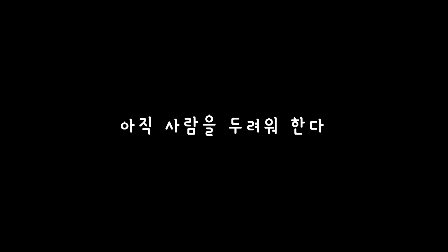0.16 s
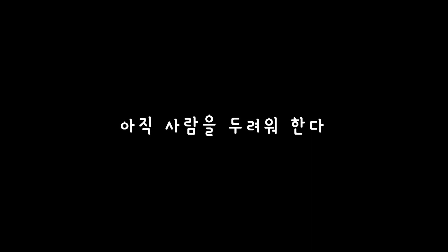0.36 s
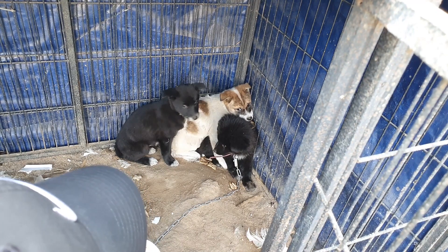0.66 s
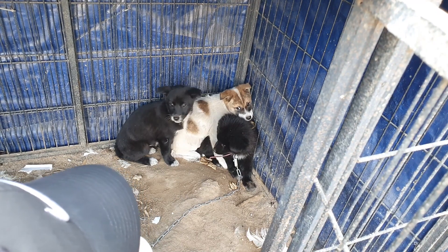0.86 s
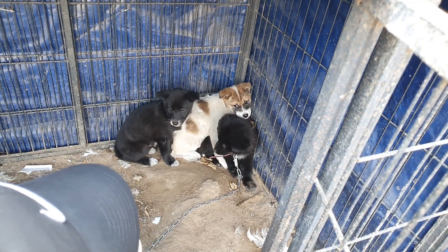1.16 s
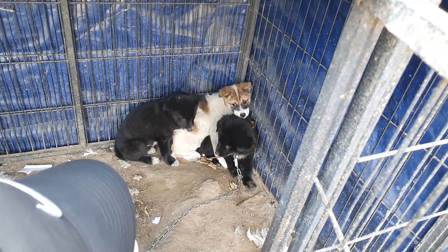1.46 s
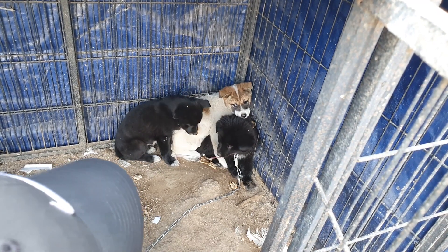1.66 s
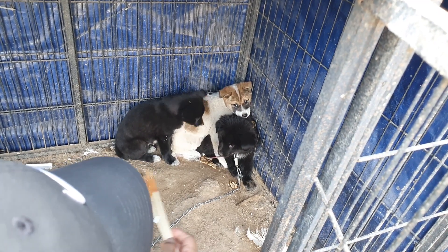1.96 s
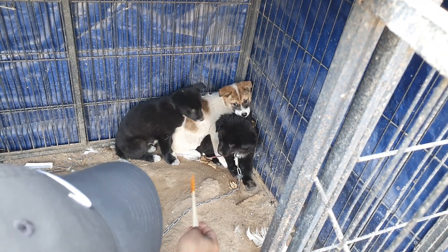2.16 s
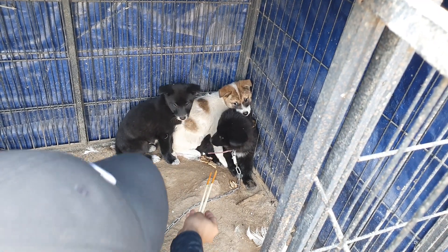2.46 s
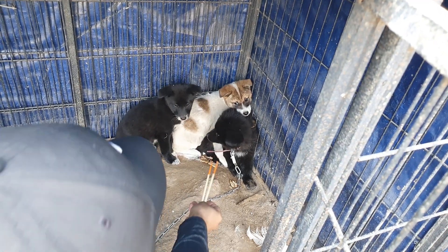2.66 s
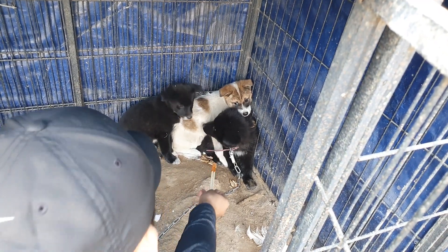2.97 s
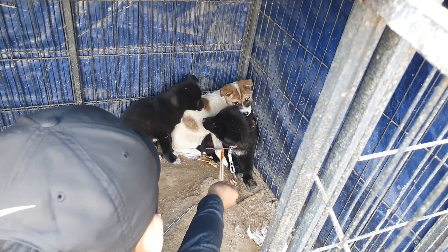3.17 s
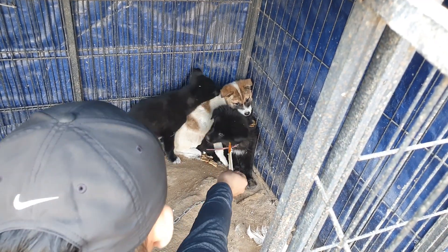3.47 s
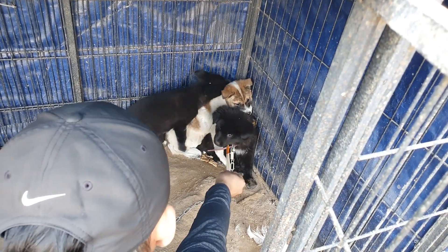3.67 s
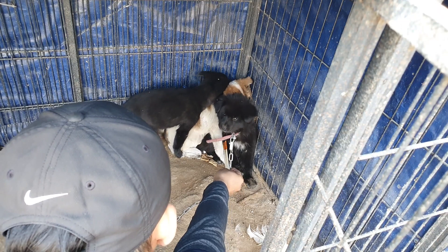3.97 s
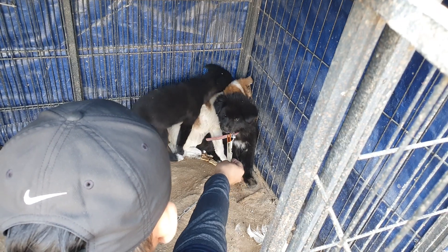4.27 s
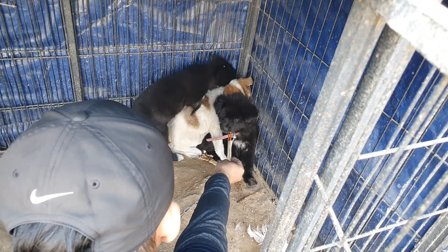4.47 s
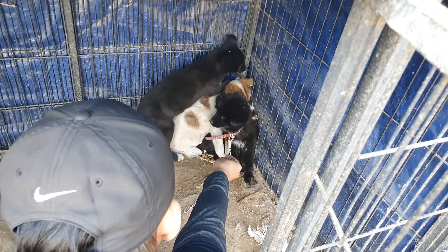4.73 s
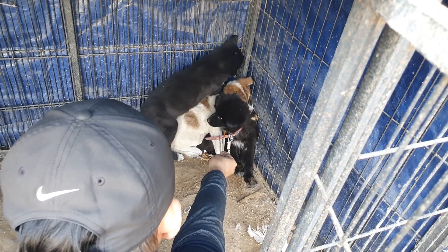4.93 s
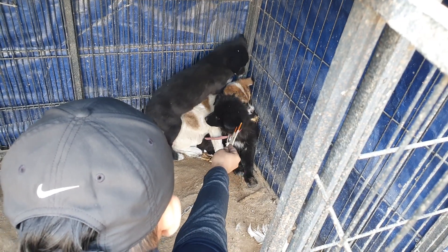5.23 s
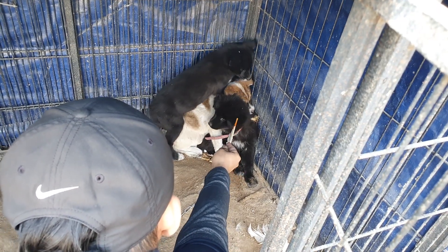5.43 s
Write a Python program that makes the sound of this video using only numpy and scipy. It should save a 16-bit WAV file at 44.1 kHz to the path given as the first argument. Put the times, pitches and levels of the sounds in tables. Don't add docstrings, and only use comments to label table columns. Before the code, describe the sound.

After brief silence, a high breaking goose wail, a rapid run of harsh honks, then quiet yard noise, sparrow chirps and distant calls.

```python
import sys
import numpy as np
from scipy import signal
from scipy.fft import rfft, irfft, next_fast_len
from scipy.io import wavfile
from scipy.ndimage import uniform_filter1d, minimum_filter1d, map_coordinates

SR = 44100
rng = np.random.default_rng(int(sys.argv[2]) if len(sys.argv) > 2 else 0)


def volts_from_db(level):
    exponent = np.asarray(level, float) / 20
    return 10 ** exponent


def master_out(mix):
    frames = np.transpose(np.atleast_2d(mix))
    ceiling = np.clip(frames, -1, 1)
    pcm = np.round(ceiling * 32767).astype(np.int16)
    wavfile.write(sys.argv[1], SR, pcm)


N = 246959
START_S = .434

# freq_hz, density_db_per_hz
YARD_SPECTRUM = [(88, -29.5), (150, -5.5), (216, -6.5), (330, -5.5), (434, -7), (572, -9.5), (825, -10),
                 (1010, -13.5), (2480, -24.5), (3260, -16.5), (5070, -35.5), (7310, -35), (12000, -53.5),
                 (15600, -82.5), (22000, -120)]
# freq_hz, likeness_0_1
YARD_LIKENESS = [(100, 0.98), (300, 1), (700, 0.65), (1500, 0.55), (4000, 0.1), (9000, 0.089)]
# freq_hz, density_db_per_hz
TRAFFIC_SPECTRUM = [(13, -67), (22, -38), (40, -12), (59, 9), (75, 5), (150, -9.5), (200, -15.5),
                    (260, -45), (440, -120)]
# time_s, level_db
TRAFFIC_COURSE = [(0.6, -58.5), (0.67, -60.5), (1.34, -60.5), (1.75, -59), (1.92, -59.5), (2.12, -59.5),
                  (2.28, -59), (2.85, -67), (3.27, -64), (3.84, -61), (4.94, -60), (5.08, -59),
                  (5.6, -56.5)]
YARD_LEVEL_DB = -66 + 1.5

# freq_hz, phase_rad
LEFT_LEAD_RAD = [(0, 0), (690, 1.5), (950, 1.9), (1380, 3.1), (2070, 4.9), (2760, 6.6), (3620, 9.2),
                 (4300, 12.7), (5170, 13.4), (7400, 20.5), (16000, 44)]
# freq_hz, gain_db
LEFT_SHADE_DB = [(200, 0), (380, -1), (690, 4), (950, -2), (1380, -7), (2070, -4.5), (2760, -6.5),
                 (3500, -10.5), (4300, -7), (5170, -1), (7400, -2), (15000, -3)]
# freq_hz, t60_s
PEN_T60 = [(200, 0.6), (1200, 0.13), (3500, 0.21), (9000, 0.03)]
# delay_ms, left_db, right_db
WALL_ECHOES = [
    (1.3, -23, -27.5),
    (2.9, -26.5, -9.5),
    (4.7, -11, -8.5),
    (7.9, 0.5, -3.5),
    (12.1, -13.5, -9),
]

# time_s, pitch_hz, level_db
CRY_COURSE = [(0.433, 673, -23.5), (0.5, 670, -22), (0.573, 635.6, -29), (0.589, 663.8, -20),
              (0.802, 725.1, -19.5), (1.097, 713.6, -21), (1.617, 686.1, -23), (1.836, 659.7, -26.5),
              (1.969, 641.7, -30), (2.032, 635, -29), (2.124, 608.3, -22.5)]
# freq_hz, then gain_db at five even stages
CRY_THROAT_DB = [(300, -42, -46.5, -64, -37.5, -35.5), (520, -29.5, -23.5, -34, -17.5, -16),
                 (692.87, -13, -26, -21, -19.5, -37), (1040, -47, -10.5, -15, -24.5, -35),
                 (1134, -0.5, -6, -2, -5.5, -2.5), (1445, 8, 0, -0.5, 2.5, -10.5),
                 (1690, -26, -17.5, -37, -32, -13.5), (1840, -32, -14, -49.5, -34, -22),
                 (2052, -42, -39.5, -46.5, -43.5, -42), (2600, -17.5, -11.5, -20, -11.5, -20),
                 (2730, -37.5, -29.5, -60, -55.5, -45), (3370, -37.5, -42, -65.5, -92, -43),
                 (3966, -29, -39, -32, -40, -29), (4486, -25, -47, -17.5, -11, -21),
                 (4575, -51.5, -74, -55.5, -47.5, -47.5), (5700, -23.5, -36, -41.5, -31.5, -33.5),
                 (8067, -56, -34.5, -35.5, -53, -52), (9150, -66, -63.5, -45, -42.5, -54.5),
                 (10842, -53.5, -56, -49, -46, -54), (16010, -66, -65, -59, -65.5, -60.5)]
# middle_s, length_s, pitch_hz, level_db
CRY_WAVERS = [
    (0.53, 0.06671, -5.5, 1),
    (1.234, .04, -8, -2),
    (1.43, 0.16, 1.5, -1),
    (0.628, 0.14, 74, 0.5),
    (0.731, 0.17, -41.5, 1),
    (0.987, 0.25, -8, 2),
    (1.72, 0.069, -2.5, -2),
    (1.775, 0.081, 0, 3),
    (1.84, 0.074, -1, 0.5),
    (1.957, 0.021, 0.5, -12),
]
# middle_s, length_s, roughness_0_1, alternation_0_1
CRY_BREAKS = [(0.504, 0.23, 0, 0), (0.93, 0.34, 0.08, 0), (2.149, .03, 0.54, .4), (0.562, 0.11, 0.56, 0.4),
              (0.66, 0.2, 0.01, 0.03), (0.735, 0.07, 0.37, 0.05), (1.952, 0.38, 0.01, 0.07),
              (0.841, 0.16, 0.06, 0), (0.873, 0.021, 0.2, 0.12), (0.918, 0.062, 0.2, 0.3),
              (0.98, 0.016, 0, 0.2), (1.026, 0.073, 0.11, 0.22), (1.451, 0.35, .001, 0.7),
              (1.601, 0.3, 0.01, 0.29), (2.151, 0.042, 0.71, 0.5)]
# freq_hz, density_db_per_hz
RASP_SPECTRUM = [(500, -65), (900, -25), (1150, 3), (1500, 8.5), (1850, 7.5), (2400, -58), (3000, -31),
                 (4000, -61)]
# freq_hz, density_db_per_hz
AIR_SPECTRUM = [(1500, -62), (2500, -23), (4300, -1), (5000, -10), (7500, 2.5), (9000, -12), (12000, -10),
                (15800, -24)]
CRY_END_S, END_FALL_HZ, END_FADE_DB = 0.065, 140.1, 31.5
TRILL_S, TRILL_LENGTH_S, TRILL_PER_S, TRILL_HZ, TRILL_DB = 0.8, 0.4, 29, 7, 1
TREMOR_SHARE, TREMOR_PER_S, SETTLES_S = .012, 260, 1.07
CRY_ROUGH_0_1 = .012
RASP_DB, AIR_DB = -6, -40

# start_s, level_db, t60_s, above_9khz_db
SNORT_PUFFS = [
    (1.244, -42.5, 0.18674, -10.5),
    (2.381, -60, 0.0095, 8.5),
    (4.652, -49.5, 0.214, 0.5),
    (4.848, -61.5, 0.2665, 1.5),
    (5.277, -55.5, 0.2786, -5.5),
]
SNORT_ATTACK_S = [0.0052, 0.00103, 0.00115, 0.0157, 0.0018]
# freq_hz, density_db_per_hz
NOSE_SPECTRUM = [(1180, -75), (2000, -45), (2200, -15.5), (3460, -0.5), (6040, -14), (8080, 1),
                 (9270, -24.5), (10500, -12), (15500, -20)]

# start_s, length_s, from_hz, to_hz, level_db
SMALL_TONES = [
    (4.675, .1, 3700, 3150, -60),
    (4.84, .055, 5150, 5300, -71),
    (4.908, .028, 3750, 3350, -57),
    (4.925, .035, 3200, 2650, -59),
    (4.84, .04, 1900, 1850, -64),
    (4.98, .01, 6700, 6400, -66),
    (3.76, .04, 420, 400, -59),
    (2.2, .2, 1290, 1240, -66),
    (2.722, .022, 1180, 1230, -37),
]

# start_s, attack_s, hold_s, peak_db, sag_db
HONK_TIMING = [(2.423, 0.078, 0.035, -13, 6.5), (2.63, 0.018894, 0.033, -14, 0),
               (2.734, 0.015, 0.054, -15, 8), (2.861, 0.022, 0.047, -9.5, 12),
               (2.921, 0.0088, 0.058, -27, -0.5), (3.022, 0.038, 0.044, -13, 2.5),
               (3.146, 0.044, 0.037, -32.5, 4), (3.218, 0.018, 0.056, -16.5, 5.5),
               (4.991, 0.052, 0.063, -29, 14), (5.219, 0.016, 0.1, -39, 1.5),
               (5.439, 0.017, 0.12, -40, 0.5)]
# start_hz, middle_hz, end_hz
HONK_PITCH_HZ = [(195, 219, 192), (223, 230, 221), (238, 218, 195), (228, 232, 222), (200, 213, 211),
                 (234, 228, 220), (209, 195, 184), (216, 208, 205), (150, 165, 157), (668, 824, 730),
                 (661, 850, 747)]
HONK_BREAKUP = [(.08, 0, 1), (.08, 0, 1), (.22, 0, .9), (.03, 0, 1), (.14, 0, .9), (0, 0, .9), (.3, 0, .9),
                (.3, 0, .8), (.15, 0, 1), (.17, .3, .55), (.2, .75, .45)]
STRONG_EVERY = [1, 1, 1, 1, 1, 1, 1, 1, 1, 3, 5]
# mode_width_hz, fundamental_db, highs_db
HONK_COLOUR = [(375, 5, 1), (230, -9, -9), (377.6, -2.5, -3.5), (170, -25, 0.5), (139.5, -15.5, -3),
               (244, -15.5, 5), (260, -8.5, -5), (330.8, 0.5, 1.5), (480, 10, -5.5), (463.3, -5.5, -0.5),
               (523, 8, -2.5)]
NECK_STRETCH = [(.9, 1.03, .94), (.96, 1.01, 1.02), (1.02, 1, 1.01), (.99, 1.01, .9), (.98, 1, 1),
                (.9, 1, .99), (1, .99, 1), (1, 1, .97), (.84, 1.1, .98), (.94, 1, 1), (.94, 1, 1)]
# middle_share, length_share, level_db, leak_ratio
PRESSURE_PUSH = [(0.79, 0.17, 1, 1.5), (0.4, 0.23, 0, 0.74), (0.19, 0.51, 4.5, 6.1), (.3, .3, 1, 1),
                 (.5, .3, -0.5, 1), (.5, .3, 2.5, 0.52), (.5, .3, -2.5, 2), (0.76, 0.13, 3.5, 2.9),
                 (0.3694, 0.16, 3, 2.885), (.5, 0.37, 1.5, 3.0196), (0.51, 0.34, 2.5, 3.8)]
# swell_exponent, release_db_per_s
HONK_EDGES = [(1.5, 949), (1.5, 899), (1.5, 948.5), (1.5, 950.5), (1.5, 949.5), (1.1, 1500), (1.5, 948.5),
              (1.3, 999), (1.4, 800), (1.6, 900), (1.6, 897.5)]
# freq_hz, gain_db
NEAR_MODES = [
    [(850, -12.5), (1292, 0), (1990, 1.5), (2850, -6.5), (3400, 5), (4177, -25.5), (4780, -26)],
    [(1141, -2.5), (1593, -18.5), (2024, -16), (2800, 1), (3300, -11), (4113, -16)],
    [(1120, 3.5), (1680, -21.5), (2842, -2), (3165, -24.5), (3833, -19), (4587, -35)],
    [(670, -19.5), (1414, 0), (4150, -5.5), (2049, -8), (2749, -0.5), (3140, -1)],
    [(624, -6), (1141, 2), (1486, -2.5), (1895, -2), (2606, -9.5), (3445, 6.5)],
    [(900, -5.5), (1141, 4.5), (1615, -19.5), (2067, -13.5), (2756, 1), (3208, -19.5), (3704, 6)],
    [(775, 1.5), (1120, -9), (1507, -11), (2649, -24), (3338, 5), (4953, -19.5)],
    [(1163, 3), (1895, -14.5), (3015, -3), (3381, -10), (3984, -7.5), (4328, -31)],
]
# freq_hz, gain_db
FAR_MODES = [
    [(581, -29), (947, -4.5), (1314, -0.5), (2089, -14), (3100, 7.5), (3850, -9), (4479, -34)],
    [(797, -8.5), (1529, -4.5), (2089, -9), (2433, -19), (3208, 1), (4694, -45)],
    [(840, -18), (1050, -9.5), (1529, -5.5), (1895, -6), (2412, -22), (3208, -0.5), (4414, -31)],
]
# start_db, end_db
BEAK_OPENING = [
    [(3, 18.5), (-1, 2.5), (5, -5), (0, -8), (-3.5, 0), (3, 0), (-1.5, 2)],
    [(-4, 4), (-3.5, -1.5), (-1.5, -5.5), (1, -9.5), (-6.5, 1), (-5, -1)],
    [(-13, 0.5), (-8.5, -1.5), (3, -1.5), (-8, 4.5), (1.5, 0.5), (0, 1)],
    [(-1, -9.5), (-4.5, 7), (3.5, 3.5), (-5.5, -5.5), (-1.5, -2.5), (6.5, -3.5)],
    [(2, -4.5), (6, 2), (-2, 6.5), (5.5, 1.5), (-3.5, 4.5), (-9.5, 2.5)],
    [(-1, -2), (-5.5, 3.5), (0.5, 3.5), (4, -7), (0.5, 4.5), (0, 0), (-2, -5)],
    [(-8.5, 2.5), (-3, 2.5), (3.5, 3), (2.5, -2), (-8, 3.5), (0, 4)],
    [(2, 0), (-3.5, -1), (6, -7.5), (2.5, -4.5), (-1.5, -0.5), (2, 0)],
    [(1, 0), (-8, 7), (-4, 12), (27, 12), (-13, -17), (-19, -20), (-27, -10)],
    [(-6, -3), (6, 9.5), (-2, -16), (-14, -3), (-9, -1), (2, 4)],
    [(12.5, -10.5), (-21, 17), (0.5, -5.5), (-4, -4), (-5, 3), (-4, -2), (-10, -5)],
]
# freq_hz, gain_db
NEAR_THROAT_DB = [(420, -62.5), (700, -14.5), (2300, -21), (3300, -4.5), (4400, -26.5), (5600, -24.5),
                  (7200, -36.5), (8900, -50.5), (10900, -43), (13000, -54.5), (15500, -56)]
# freq_hz, gain_db
FAR_THROAT_DB = [(330, -31.5), (600, -14.5), (2200, -22.5), (2600, -21), (3700, -2.5), (4500, -24.5),
                 (7500, -44), (8700, -55), (11000, -43), (15500, -63)]
ONSET_DB, RELEASE_S = 38, 0.032
ROUGH_PER_DB = 0.0055
SLOW_AT_SHARE, SLOW_LENGTH_SHARE = 0.59, 0.7
BREATH_DB_PER_DB, DULL_START_DB = 0.26, 7
BEAK_DB, BEAK_FROM_HZ, SWAY_RAD = 2.4, 3000, .6


def along(points, hz):
    f, v = np.transpose(points)
    return np.interp(np.log(hz + 1), np.log(f + 1), v)


def column(rows, k, s):
    rows = np.asarray(rows)
    return np.interp(s, rows[:, 0], rows[:, k])


def unit(x):
    return x / np.sqrt(np.mean(x ** 2) + 1e-20)


def bump(t, middle, length):
    return np.cos(np.pi * np.clip((t - middle) / length, -.5, .5)) ** 2


def wander(count, at):
    return map_coordinates(rng.standard_normal(count), [at])


def filtered(x, response):
    m = next_fast_len(N + 8192)
    return irfft(rfft(x, m) * response(np.fft.rfftfreq(m, 1 / SR)), m)[..., :N]


def coloured(x, spectrum):
    return unit(filtered(x, lambda hz: volts_from_db(along(spectrum, hz))))


def causal(gain_db):
    cepstrum = irfft(np.log(volts_from_db(gain_db(np.fft.rfftfreq(4096, 1 / SR)))))
    cepstrum[1:2048] *= 2
    cepstrum[2049:] = 0
    h = irfft(np.exp(rfft(cepstrum)))[:2048]
    return h / np.linalg.norm(h)


def background():
    z = signal.stft(rng.standard_normal((3, N)), nperseg=512)[2]
    patches = uniform_filter1d(rng.standard_normal(z.shape[1:]), size=8, axis=0)
    patches = uniform_filter1d(patches, size=10, axis=1)
    common, left, right = signal.istft(z * volts_from_db(1.6 * unit(patches)), nperseg=512)[1][:, :N]
    alike = lambda hz: np.clip(along(YARD_LIKENESS, hz), 0, 1)
    shared = ports(filtered(common, lambda hz: np.sqrt(alike(hz))))
    separate = filtered(np.array([left, right]), lambda hz: np.sqrt(1 - alike(hz)))
    yard = coloured(shared + separate, YARD_SPECTRUM)
    t = np.arange(N) / SR
    lumps_db = 1.6 * wander(60, t * 7)
    rumble = coloured(rng.standard_normal(N) + 0.11 * rng.standard_normal((2, N)), TRAFFIC_SPECTRUM)
    return volts_from_db(YARD_LEVEL_DB) * yard + volts_from_db(column(TRAFFIC_COURSE, 1, t) + lumps_db) * rumble


def ports(x):
    f, rad = np.transpose(LEFT_LEAD_RAD)
    left = lambda hz: volts_from_db(along(LEFT_SHADE_DB, hz)) * np.exp(1j * np.interp(hz, f, rad))
    return filtered(x, lambda hz: [left(hz), np.exp(0j * hz)])


def cry():
    t = np.arange(CRY_COURSE[0][0], CRY_COURSE[-1][0] + CRY_END_S, 1 / SR)
    age_s = t - t[0]
    end = np.clip((t - CRY_COURSE[-1][0]) / CRY_END_S, 0, 1)
    trill = bump(t, TRILL_S, TRILL_LENGTH_S) * np.cos(2 * np.pi * TRILL_PER_S * (t - TRILL_S))
    jerk_hz = sum(hz * bump(t, s, length) for s, length, hz, db in CRY_WAVERS)
    jerk_db = sum(db * bump(t, s, length) for s, length, hz, db in CRY_WAVERS)
    pitch_hz = column(CRY_COURSE, 1, t) + jerk_hz + TRILL_HZ * trill - END_FALL_HZ * end ** 1.3
    tremor = TREMOR_SHARE * np.clip((SETTLES_S - t) / .05, .1, 1)
    pitch_hz = pitch_hz * (1 + tremor * wander(900, age_s * TREMOR_PER_S))
    effort_db = column(CRY_COURSE, 2, t) + jerk_db + TRILL_DB * trill - END_FADE_DB * end ** 1.1
    breaks = sum(r * bump(t, s, length) for s, length, r, alt in CRY_BREAKS)
    rough = np.clip(CRY_ROUGH_0_1 + breaks, 0, 1)
    alternate = np.clip(sum(alt * bump(t, s, length) for s, length, r, alt in CRY_BREAKS), 0, 1)
    level_db = effort_db - 4.5 + (.6 + 2.5 * rough) * wander(200, age_s * 45)
    f, *shapes = np.transpose(CRY_THROAT_DB)
    throats = [lambda hz, db=db: along(np.transpose([f, db]), hz) + windpipe(hz, 510, 0.012)
               for db in shapes]
    tone = voice(t, pitch_hz, level_db, rough / 2, alternate, count=2, throats=throats,
                 jitter=0.032, leak=0.079)
    return turbulence(t, pitch_hz, level_db, rough) + tone


def voice(t, hz, level_db, rough, slow, count, throats, jitter, leak):
    cycles = np.cumsum(hz) / SR
    at = np.flatnonzero(np.diff(np.floor(cycles)))
    period = SR / hz[at]
    chance = rng.standard_normal((len(at), 2))
    late = (1 - cycles[at] % 1) * period
    place = np.clip(at + late + jitter * rough[at] * chance[:, 0] * period, 8, len(t) - 9)
    strong = np.arange(len(at)) % count == 0
    beat = 1 + slow[at] * (count * strong - 1)
    size = beat * volts_from_db(level_db[at] + 9.34 * rough[at] * chance[:, 1]) * np.sqrt(period)
    taps = np.floor(place)[:, None] + np.arange(-7, 9)
    offset = taps - place[:, None]
    shape = np.sinc(offset) * np.cos(np.pi * offset / 17) ** 2
    pulses = np.bincount(taps.astype(int).ravel(), (size[:, None] * shape).ravel(), len(t) + 16)
    gate = 1 + 0.59 * np.cos(2 * np.pi * cycles - 1.2)
    breath = volts_from_db(level_db) * leak * (0.014 + rough) * gate * rng.standard_normal(len(t))
    air = pulses[:len(t)] + breath
    stage = np.linspace(0, len(throats) - 1, len(t))
    sound = 0
    for k, gain_db in enumerate(throats):
        share = np.clip(1 - abs(stage - k), 0, 1)
        sound = sound + signal.fftconvolve(air * share, np.convolve(causal(gain_db), smear(.004)))
    out = np.zeros(N + SR)
    out[round((t[0] - .003) * SR):][:len(sound)] = sound
    return out[:N]


def windpipe(f, spacing_hz, echo):
    return -20 * np.log10(np.abs(1 - np.clip(echo, 0, .85) * np.exp(-2j * np.pi * f / spacing_hz)))


def smear(seconds):
    f = np.fft.rfftfreq(1024, 1 / SR)
    delay_s = seconds * np.clip(f / 4500, 0, 1)
    return irfft(np.exp(-2j * np.pi * np.cumsum(delay_s) * f[1]))


def turbulence(t, pitch_hz, level_db, rough):
    gate = 1 + 0.3 * np.cos(2 * np.pi * np.cumsum(pitch_hz) / SR)
    strength = np.array([volts_from_db(RASP_DB) * rough, volts_from_db(AIR_DB + 2.2 * (t < SETTLES_S))])
    level = np.zeros((2, N))
    level[:, round(t[0] * SR):][:, :len(t)] = volts_from_db(level_db) * gate * strength
    rasp = coloured(rng.standard_normal(N), RASP_SPECTRUM)
    air = coloured(rng.standard_normal(N), AIR_SPECTRUM)
    return level[0] * rasp + level[1] * air


def beak(x):
    hz, _, z = signal.stft(x, SR, nperseg=512)
    fields = uniform_filter1d(rng.standard_normal(z.shape), size=7, axis=1)
    strength, turn = uniform_filter1d(fields, size=9, axis=2)
    sides = np.array([1, -1])[:, None, None]
    z = z * np.exp(1j * SWAY_RAD * hz[:, None] / 10000 * unit(turn) * sides)
    depth_db = BEAK_DB * np.clip(hz / BEAK_FROM_HZ, 0, 1.25)[:, None] ** 2
    return signal.istft(z * volts_from_db(depth_db * unit(strength)), SR, nperseg=512)[1][:, :N]


def pen(x):
    hz, t, z = signal.stft(rng.standard_normal((2, SR // 2)), SR, nperseg=256)
    tail = signal.istft(z * volts_from_db(-60 * t / along(PEN_T60, hz)[:, None]), SR, nperseg=256)[1]
    tail = volts_from_db(-20.5) * np.pad(tail / np.linalg.norm(tail[0]), ((0, 0), (300, 0)))
    for delay_ms, *side_db in WALL_ECHOES:
        tail[:, round(delay_ms * SR / 1000)] += volts_from_db(np.array(side_db) - 21.5)
    return signal.fftconvolve(x[None], tail, axes=1)[:, :N]


def snorts():
    t = np.arange(N) / SR
    hiss = coloured(rng.standard_normal(N) + .5 * rng.standard_normal((2, N)), NOSE_SPECTRUM)
    high = filtered(hiss, lambda f: f > 9000)
    out = np.zeros((2, N))
    for (s, db, t60_s, high_db), rise_s in zip(SNORT_PUFFS, SNORT_ATTACK_S):
        puff = volts_from_db(db - 60 * np.abs(t - s) / t60_s) * np.clip((t - s) / rise_s, 0, 1)
        out += puff * (hiss + (volts_from_db(high_db) - 1) * high)
    return out


def small_sounds():
    t, out = np.arange(N) / SR, np.zeros(N)
    for s, length_s, from_hz, to_hz, db in SMALL_TONES:
        u = np.clip((t - s) / length_s, 0, 1)
        unsteady = wander(2000, t * 300)
        cycles = length_s * (from_hz * u + (to_hz - from_hz) * u * u / 2)
        tone = np.sin(2 * np.pi * cycles + 1.7 * unsteady)
        out += volts_from_db(db + 4.2 * unsteady) * np.sin(np.pi * u) * tone
    return out


def honks():
    out = np.zeros(N)
    for i, (s, attack_s, hold_s, peak_db, sag_db) in enumerate(HONK_TIMING):
        first_hz, middle_hz, last_hz = HONK_PITCH_HZ[i]
        rough, slow, hoarse = HONK_BREAKUP[i]
        push_at, push_length, push_db, leak = PRESSURE_PUSH[i]
        bite, release_db_per_s = HONK_EDGES[i]
        t = np.arange(0, attack_s + hold_s + RELEASE_S, 1 / SR)
        u = t / t[-1]
        under_db = ONSET_DB * np.clip(1 - t / attack_s, 0, 1) ** bite
        under_db += sag_db * np.clip((t - attack_s) / hold_s, 0, 1)
        under_db += release_db_per_s * np.clip(t - attack_s - hold_s, 0, 1)
        arch_hz = (middle_hz - (first_hz + last_hz) / 2) * (1 - (2 * u - 1) ** 2)
        pitch_hz = first_hz + (last_hz - first_hz) * u + arch_hz
        level_db = peak_db - under_db + push_db * bump(u, push_at, push_length)
        roughness = np.clip(rough * np.clip(hoarse + 2 * u ** 2, 0, 1) + ROUGH_PER_DB * under_db, 0, 1)
        beat = np.clip(slow, 0, 1) * bump(u, SLOW_AT_SHARE, SLOW_LENGTH_SHARE)
        breath = leak * volts_from_db(BREATH_DB_PER_DB * under_db * (t < attack_s))
        out += voice(s + t, pitch_hz, level_db, roughness, beat, count=STRONG_EVERY[i],
                     throats=honk_throats(i), jitter=.3, leak=breath)
    return out


def honk_throats(i):
    width_hz, chest_db, high_db = HONK_COLOUR[i]
    modes = (NEAR_MODES + FAR_MODES)[i]
    low_hz = min(HONK_PITCH_HZ[i][1] / STRONG_EVERY[i], 240)
    chest = [(.3 * low_hz, -60), (.7 * low_hz, chest_db - 36), (low_hz, chest_db - 19),
             (1.25 * low_hz, chest_db - 36)]
    points = chest + (NEAR_THROAT_DB if HONK_TIMING[i][0] < 4 else FAR_THROAT_DB)

    def gain_db(f, stretch, p):
        g = f / stretch
        rings = 0
        for (hz, db), (early_db, late_db) in zip(modes, BEAK_OPENING[i]):
            mode_db = db + np.interp(p, [0, .5, 1], [early_db, 0, late_db])
            rings = rings + volts_from_db(mode_db) / (1 + (2 * (g - hz) / width_hz) ** 2) ** 2
        tilt_db = (high_db - DULL_START_DB * max(1 - 4 * p, 0)) * np.clip(f / 5000, 0, 1)
        rest = volts_from_db(along(points, g) + windpipe(g, 537.6, 0.51) + tilt_db)
        return 20 * np.log10(rings + rest)

    stages = np.linspace(0, 1, num=11)
    stretches = np.interp(stages ** .5, [0, .5 ** .5, 1], NECK_STRETCH[i])
    return [lambda f, k=k, p=p: gain_db(f, k, p) for k, p in zip(stretches, stages)]


def scene():
    geese, small = cry() + honks(), small_sounds()
    return beak(ports(geese)) + ports(small) + pen(geese + small) + snorts() + background()


def band_limit(x):
    return signal.sosfilt(signal.butter(12, 15850, fs=SR, output="sos"), x)


def record(dry):
    need = np.clip(.62 / (np.abs(dry).max(axis=0) + 1e-9), 0, 1)
    gain = uniform_filter1d(minimum_filter1d(need, size=260), size=130)
    opened = np.arange(N) > START_S * SR
    return band_limit(dry * gain * opened)


dry = scene()
out = record(dry)
master_out(out)
```